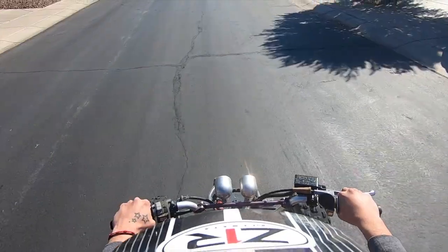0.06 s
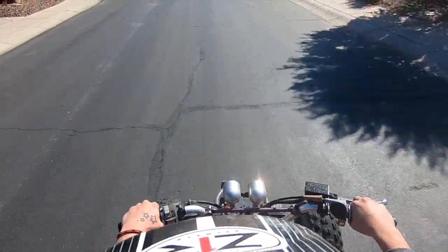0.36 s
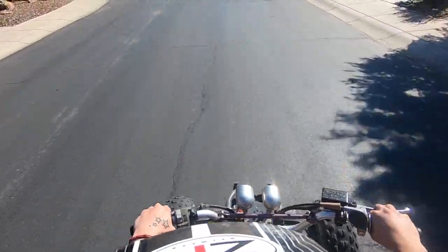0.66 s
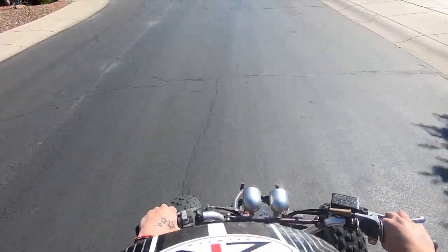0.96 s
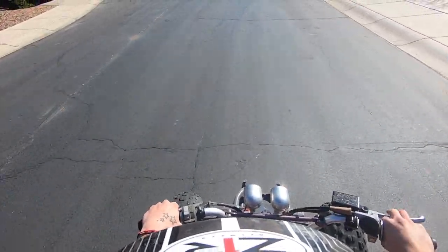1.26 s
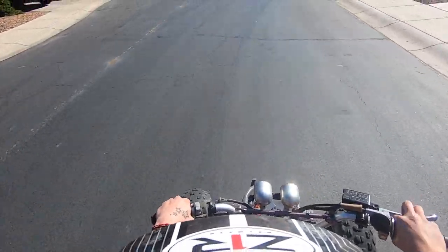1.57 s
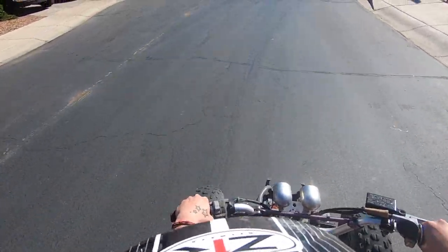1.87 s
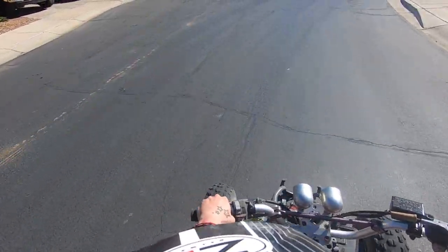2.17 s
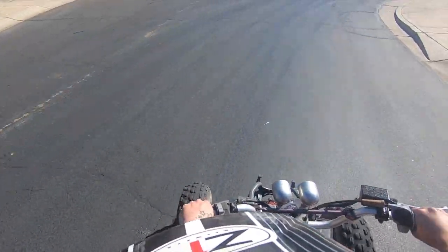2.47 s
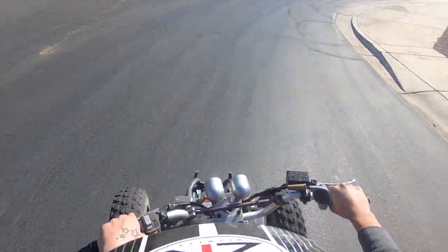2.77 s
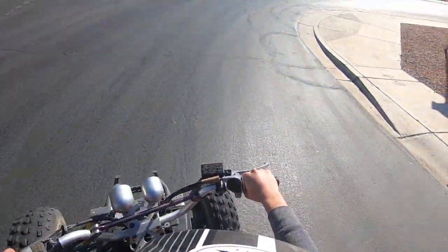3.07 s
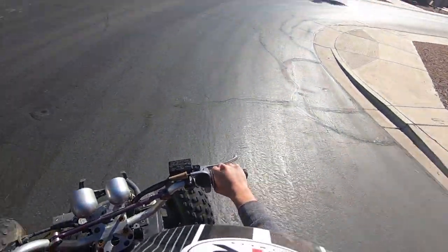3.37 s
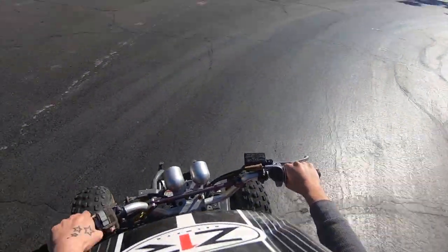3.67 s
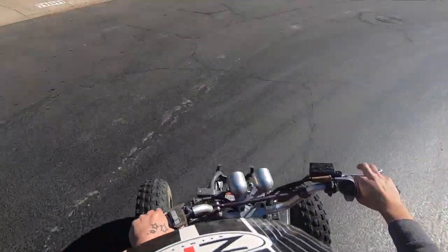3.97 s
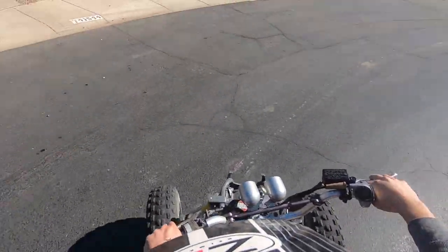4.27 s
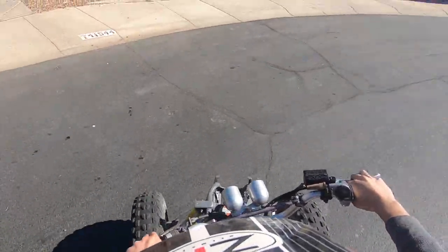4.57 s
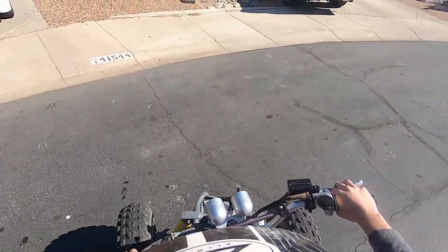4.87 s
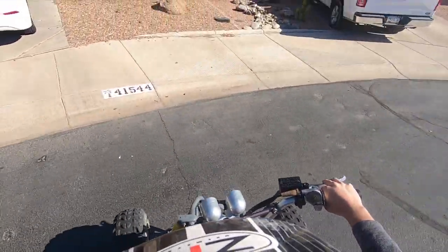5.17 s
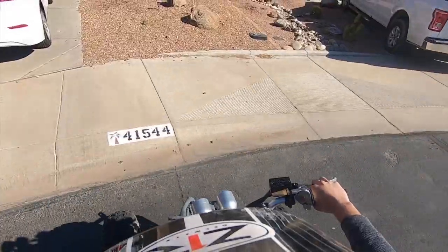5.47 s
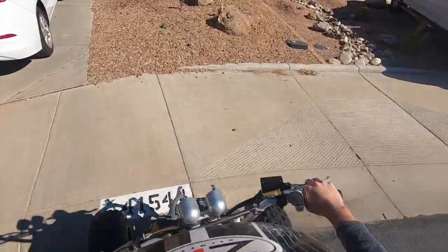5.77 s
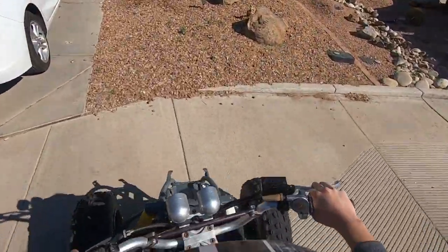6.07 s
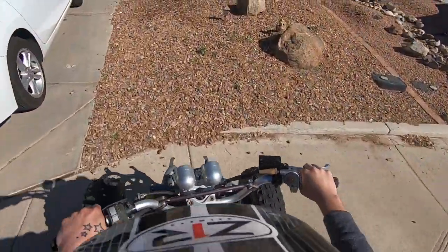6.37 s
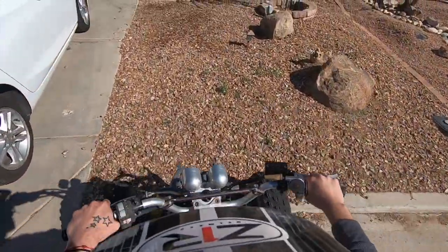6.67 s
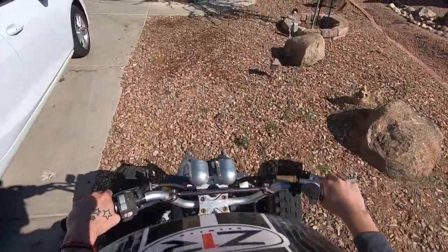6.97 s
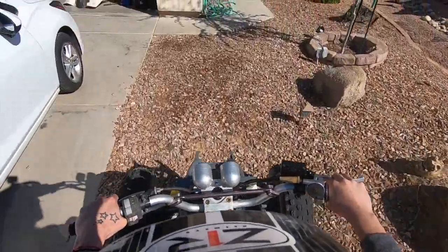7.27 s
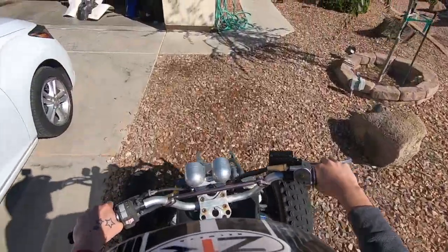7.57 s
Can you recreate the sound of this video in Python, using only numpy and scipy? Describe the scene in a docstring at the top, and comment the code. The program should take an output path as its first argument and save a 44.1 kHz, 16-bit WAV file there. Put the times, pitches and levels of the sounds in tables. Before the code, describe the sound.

A two-stroke quad bike rides along a street on light throttle, heard from the rider's helmet just above the engine. It rises in pitch and runs in short, booming pulses over rattling parts and soft tyre roar. A brake chirps repeatedly, and one hard gust hits the microphone midway. The engine falls, stumbling into single metallic pops, then settles to a quick, regular putter as gravel clicks faintly under the tyres.

```python
"""A street, from a microphone on the rider's helmet, close above a two-stroke quad bike on light throttle.
The crank pumps a hum through the pipe. At speed the charge lights in short booming runs, about ten a
second; lower down the engine stumbles and lets off single pops, each with a metallic crack. Loose parts
rattle, a brake chirps and the tyres roar softly. The quad slows to a quick, regular putter as it rolls
onto gravel. A little wind rumbles on the microphone, with one hard gust midway."""
import sys
import numpy as np
from scipy import signal
from scipy.fft import rfft, irfft
from scipy.io import wavfile
from scipy.ndimage import uniform_filter1d

SR = 44100
rng = np.random.default_rng(int(sys.argv[2]) if len(sys.argv) > 2 else 0)


def store_wav(level_fs):
    """Save 16-bit WAV to argv[1]."""
    pcm = np.round(np.clip(np.atleast_2d(level_fs), -1, 1) * 32767)
    wavfile.write(sys.argv[1], SR, pcm.T.astype(np.int16))


N = 335601
TIME = np.arange(N) / SR
HZ = np.fft.rfftfreq(N, 1 / SR)

# Single pops. Each row: start in seconds, crack in dB over the coasting engine, relative boom in dB.
POPS = [(0.09, 6, 0.5), (0.134, 2, -3.5), (0.168, 6.5, -12.5), (0.2, 6, 1), (0.272, 0, -0.5),
        (0.355, 4.5, 4.5), (0.451, -5, 6.5), (3.741, 3, 5.5), (3.785, 6, -1), (3.858, 9, -1),
        (3.927, 9, -0.5), (3.97, 5, -0.5), (4.017, 10, 1.5), (4.1, 3, 4), (4.143, 3, 8), (4.191, 10, 1.5),
        (4.298, 9, -2.5), (4.332, -5, -1.5), (4.389, 11.5, 5.5), (4.424, 7.5, 3.5), (4.541, 12, 4),
        (4.627, 6.5, 10), (4.712, 8, 8), (4.761, -1, 1), (4.796, 5, 5), (4.842, 12, -2), (4.923, 11, 8.5),
        (4.999, 8.5, 7), (5.052, 8, 2), (5.083, 9.5, -1.5), (5.116, 5, 8.5), (5.157, 8.5, 4.5),
        (5.192, 9, 3), (5.248, 1, 1.5), (5.303, 8, 4.5), (5.338, 1, -4.5), (5.42, 1.5, 6.5),
        (5.524, 5.5, 6), (5.575, -0.5, 3.5), (5.618, 3.5, 7), (5.669, 1, 5), (5.711, 5.5, 7.5),
        (5.766, 4, 7), (5.805, 5.5, 8.5), (5.861, -3, 6), (5.911, 8, 4.5), (5.959, 1, 1), (6.007, 4, 2.5),
        (6.064, -9, 1.5), (6.128, 5, 5), (6.169, -8, -2.5), (6.207, 3, 3.5), (6.263, 0, 10.5),
        (6.309, 9, 4), (6.363, 9.5, -1), (6.419, 6, 10.5), (6.471, 5, 8), (6.519, 8.5, 5.5),
        (6.566, 3, 9.5), (6.613, 3, 11), (6.658, 5, 10.5), (6.702, 2, 5), (6.747, 0, 8.5), (6.788, 1, 9),
        (6.847, 4, 8.5), (6.897, 1, 8), (6.945, 7.5, 5.5), (6.996, 4.5, 7.5), (7.034, -3, 10),
        (7.077, 4, 8.5), (7.116, 5, 8), (7.171, 7.5, 5), (7.226, 5, 1.5), (7.279, 4, 9.5), (7.32, 6, 8),
        (7.374, 6, 9), (7.42, 3, 6), (7.462, 8.5, 9), (7.507, 8.5, 6), (7.555, 2, 2)]


def amp(db):
    """Decibels to gain."""
    return 10 ** (np.asarray(db) / 20)


def unit(x):
    """Scales to rms 1."""
    return x / np.sqrt(np.mean(x ** 2) + 1e-20)


def smooth(x, size):
    """Running mean over size samples, taken twice."""
    return uniform_filter1d(uniform_filter1d(x, size), size)


def steady(x, size=7000):
    """Holds the slow level at rms 1 and keeps the fast beats."""
    return x / np.sqrt(abs(smooth(x ** 2, size)) + 1e-12)


def drift(size):
    """Random wander of rms 1, smoothed over size samples."""
    return unit(smooth(rng.standard_normal(N), size))


def curves(table, at=TIME):
    """Reads a table's later columns along its first, by default at every sample's time."""
    axis, *columns = np.transpose(table)
    return [np.interp(at, axis, column) for column in columns]


def response(points, hz=HZ):
    """Gain of a spectrum at the given frequencies."""
    point_hz, db = np.transpose(points)
    return amp(np.interp(np.log(hz + 1), np.log(point_hz), db))


def peaks(modes):
    """Summed gain of resonances with steep skirts."""
    return np.sqrt(sum(amp(db) ** 2 / (1 + ((HZ - hz) / width) ** 2) ** 2 for hz, width, db in modes))


def colour(x, gain):
    """Minimum-phase filter with the given gain at each frequency of HZ."""
    coarse_gain = np.interp(np.fft.rfftfreq(8192, 1 / SR), HZ, gain)
    cepstrum = irfft(np.log(np.maximum(coarse_gain, 1e-5)))
    cepstrum[1:4096] *= 2
    cepstrum[4097:] = 0
    impulse = irfft(np.exp(rfft(cepstrum)))[:4096]
    return signal.oaconvolve(x, impulse)[:N]


def firings(pop_decay_s=.023, pop_length_s=.025, pop_shift_db=-5.5):
    """Crack and boom envelopes, 1 when coasting: a firing cracks quickly as its boom swells and fades."""
    # Runs of firing at speed. Each row: start in seconds, boom in dB over coasting, length in seconds.
    runs = [(0.462,2,0.18),(0.603,2.5,0.055),(0.673,2.5,0.04),(0.96,3.5,0.045),(1.044,5.5,0.056),(1.119,-2,0.078),(1.177,0,0.068),(1.256,7.5,0.05),(1.363,4,0.033),(1.496,8.5,0.015),(1.574,4.5,0.064),(1.669,9,0.054),(1.754,6,0.059),(1.86,-1.5,0.1),(1.973,0.5,0.033),(2.056,1.5,0.027),(2.179,9,0.028),(2.291,8.5,0.048),(2.401,8,0.031),(2.501,6.5,0.038),(2.57,4.5,0.054),(2.629,11.5,0.017),(2.664,8.5,0.045),(2.718,6,0.032),(2.762,3.5,0.039),(2.821,1.5,0.062),(2.932,6.5,0.047),(3.027,10,0.048),(3.13,8.5,0.034),(3.214,6,0.028),(3.254,3,0.054),(3.324,7,0.05),(3.4,6.5,0.058),(3.497,2.5,0.037),(3.59,3.5,0.071),(3.698,6,0.032)]
    events = [(s, 5 + .48 * db, .63 * length, db, length) for s, db, length in runs]
    events += [(s, crack_db, pop_decay_s, db + pop_shift_db, pop_length_s) for s, crack_db, db in POPS]
    crack_power, boom_power = np.ones(N), np.ones(N)
    for s, crack_db, decay, boom_db, length in events:
        start = round(s * SR)
        part = slice(start, start + SR // 5)
        t = TIME[part] - TIME[start]
        snap = (1 - np.exp(-t / (.1 * decay))) * np.exp(-t / decay)
        swell = abs(np.sin(np.pi * np.minimum(t / length, 1))) ** .7
        crack_power[part] += (amp(crack_db) * snap) ** 2
        boom_power[part] += (amp(boom_db) * swell) ** 2
    return np.sqrt(crack_power), np.sqrt(boom_power)


def exhaust(speed, turns, boom, clearing=.04, full_pickup=190):
    """Expansion chamber: a steady hum plus the burble of uneven puffs, roughest in a flat spot."""
    # Each row: time in seconds, level in dB.
    levels = [(0,-18.5),(.4,-11.5),(.95,-11),(1.4,-13.5),(2.2,-12),(3.4,-12),(3.68,-18),(4.05,-12.5),(4.42,-14),(4.95,-13),(7.61,-12.5)]
    # How the charge burns. Each row: turns a second, uneven share of the power, upper modes' gain in dB.
    burn = [(74.4,.17,-3.5),(79,.22,-2),(85.5,.27,-.5),(99.3,.42,2),(111,.72,7),(124,.28,3),(132,.16,2),(142,.14,0),(158,.27,-3)]
    # The chamber's rings. Each row: frequency in Hz, width in Hz, relative level in dB.
    deep_modes = [(137.3, 18.5, -6.5), (225.3, 14.9, 4.5)]
    upper_modes = [(265.5, 20.5, -2), (303.4, 59.4, -3.5), (408.3, 14, -5)]
    rough, upper_db = curves(burn, at=speed)
    pickup = smooth(np.gradient(speed, TIME), size=4000)  # turns a second gained each second
    rough *= 1 - clearing * np.clip(pickup / full_pickup, 0, 1)  # clears a little as the engine pulls
    uneven = puffs(turns, mean=.17, hiss=.085)
    rings = colour(uneven, peaks(deep_modes)) + amp(upper_db) * colour(uneven, peaks(upper_modes))
    burble = steady(steady(rings, size=1100) * boom ** .5)
    blend = np.sqrt(1 - rough) * hum(speed, turns, boom) + np.sqrt(rough) * burble
    return amp(curves(levels)[0]) * blend


def puffs(turns, mean, hiss):
    """One puff of uneven strength every half turn, with a little turbulence."""
    beats = np.diff(np.floor(2 * turns), prepend=0) > 0
    return unit(beats * (mean + rng.standard_normal(N))) + hiss * rng.standard_normal(N)


def hum(speed, turns, boom, flutter=.29, odd_swell=.98, even_swell=1.56):
    """Low crank orders sweep through the pipe's response; the one nearest its tuning stands out."""
    # Each row: multiple of the crank speed, relative level in dB ahead of the pipe.
    orders = [(1, 0.5), (2, 1), (3, 5), (4, -4.5), (5, 4)]
    # Pipe and silencer. Each row: frequency in Hz, gain in dB.
    pipe = [(65, -29), (86, -3.5), (104, -15.5), (116, -18), (145, -8), (180, -4.5), (220, -1.5),
            (265, 1.5), (305, -1), (345, -7), (385, -13), (430, -17), (490, -19), (600, -25.5), (800, -31)]
    out = np.zeros(N)
    for k, db in orders:
        swell = boom ** (odd_swell if k % 2 else even_swell)
        out += amp(db) * response(pipe, k * speed) * order_tone(turns, k, flutter) * swell
    return steady(out)


def order_tone(turns, k, flutter):
    """One multiple of the crank speed, wavering in strength."""
    waver = 1 + flutter * drift(900)
    return waver * np.cos(2 * np.pi * (k * turns + rng.random()))


def rasp(turns, crack, boom):
    """Sharp puffs excite the tailpipe's rings."""
    # Each row: frequency in Hz, width in Hz, relative level in dB.
    modes = [(504, 64.5, -3), (592.8, 35.5, 4.5), (672.4, 14, 2), (750, 36, -1.5), (867, 41, -10.5),
             (920, 244, -18.5)]
    slaps = puffs(turns, mean=.6, hiss=.4) * crack ** .75 * boom ** .35
    return steady(colour(slaps, peaks(modes)))


def putter(speed, level_db=-27, strengths=(1, .4, 1, .35, .55), spread_db=3.5):
    """Each pop sends a few sharp puffs, half a turn apart, down the ringing pipe and silencer."""
    # Each row: frequency in Hz, width in Hz, relative level in dB.
    modes = [(342.5,39,1),(411,21,4),(553,39,-5.5),(587,20,-7.5),(689,6.1,-4),(735,27.4,-5),(931,40,-12.5),(1344,32,-22)]
    slaps = np.zeros(N + SR)
    for s, _, db in POPS:
        half_turn_s = .5 / np.interp(s, TIME, speed)
        for k, strength in enumerate(strengths):
            at = round((s + k * half_turn_s) * SR)
            slaps[at] += strength * amp(db + spread_db * rng.standard_normal())
    return amp(level_db) * unit(colour(slaps[:N], peaks(modes)))


def whine(speed, turns, boom, flutter=.36, swell=.9, slip=.032):
    """High crank orders light up as they cross the tailpipe's tuning, and get ragged at speed."""
    # Each row: multiple of the crank speed, relative level in dB.
    orders = [(4, 6), (5, -7), (6, -10), (7, -5), (8, -9), (9, 2.5), (10, 4)]
    # Each row: frequency in Hz, gain in dB.
    tailpipe = [(450,-19.5),(540,-6.5),(595,-3),(640,-2.5),(672,1),(705,-9.5),(742,7.5),(790,-12),(900,-18.5),(1300,-37.5)]
    # Each row: time in seconds, level in dB.
    levels = [(0,-42),(.58,-38),(.72,-31),(.88,-34),(1.15,-30),(1.65,-27),(2.1,-34),(3.4,-33),(4.2,-38),(5.9,-36),(6.06,-27.5),(6.26,-26.5),(6.4,-34),(6.65,-30),(6.95,-33),(7.17,-29),(7.37,-27),(7.61,-34)]
    strain = (speed / speed.max()) ** 2
    ragged_turns = turns + slip * strain * drift(300)
    tones = sum(amp(db) * response(tailpipe, k * speed) * order_tone(ragged_turns, k, flutter * strain)
                for k, db in orders)
    return amp(curves(levels)[0]) * steady(tones * boom ** (swell * np.sqrt(strain)))


def clatter(turns, decay_turns, spread_db):
    """Piston and port noise: a burst of uneven size every half turn over an even hiss."""
    stroke = (2 * turns).astype(int)
    sizes = amp(spread_db * rng.standard_normal(N))[stroke]
    bursts = sizes * np.exp(-(turns % .5) / decay_turns)
    return unit((1 + bursts) * rng.standard_normal(N))


def cases(blows):
    """Cylinder and cases clatter; each of their rings comes and goes on its own."""
    # The broad clatter. Each row: frequency in Hz, relative level in dB.
    spectrum = [(400, -6.5), (900, 10), (1200, 3), (1650, 2), (2000, 2), (2400, -5), (3300, 0.5),
                (4200, -4), (5200, -10), (5900, -15.5), (7600, -19), (8500, -32), (11000, -25),
                (16000, -57.5)]
    # The rings on top of it. Each row: frequency in Hz, width in Hz, relative level in dB.
    modes = [(2704, 250, 2), (3447, 190, 6), (3700, 450, -7.5), (4138, 71, 10), (4773, 110, 6),
             (7600, 600, 3)]
    body = response(spectrum)
    out = colour(blows, body * np.hypot(1, peaks(modes) / 2))
    shake = np.sqrt(abs(smooth(blows ** 2, size=40)))
    for mode in modes:
        wander = amp(2.2 * drift(3000) - 2.5)
        out += wander * colour(shake * rng.standard_normal(N), body * peaks([mode]))
    return steady(out)


def wall_ring(knocks, force):
    """The thin pipe wall sings on one sharp mode or buzzes on the dull cluster around it."""
    # Each row: frequency in Hz, width in Hz, relative level in dB.
    sharp_mode = [(1411, 18, 0)]
    cluster = [(1283, 51, -1.4), (1483, 126, 0.42)]
    # Each row: time in seconds, share of the wall's power in the sharp mode.
    shares = [(0, 0.86), (.7, 0.06), (1.6, 0.05), (2.3, 0.28), (3.1, 0.72), (3.7, 0.82), (4.1, 0.13),
              (7.6, 0.69)]
    sharp, = curves(shares)
    song = steady(colour(knocks, peaks(sharp_mode)), size=700) * smooth(force, size=400)
    buzz = colour(knocks * force, peaks(cluster))
    return np.sqrt(sharp) * steady(song) + np.sqrt(1 - sharp) * steady(buzz)


def pinging(knocks, crack):
    """Two thin metal parts ping at each firing and ring on briefly."""
    # Each row: frequency in Hz, width in Hz, how sharply the part answers a firing.
    parts = [(2755, 55, 2.4), (3775, 60, 2.4)]
    # Each row: time in seconds, lower ping in dB, upper ping in dB.
    levels = [(0,-42,-44),(.45,-56,-49),(2.1,-56.5,-66),(2.65,-44,-45),(3.25,-56,-55),(3.6,-44,-41),(4.4,-53,-41),(5.0,-53,-49),(5.4,-58,-64),(7.61,-49,-44.5)]
    out = np.zeros(N)
    for (hz, width, sharpness), db in zip(parts, curves(levels)):
        pole = np.exp(-2 * np.pi * width / SR)
        swell = np.sqrt(signal.lfilter([1 - pole], [1, -pole], crack ** (2 * sharpness)))
        ring = steady(colour(knocks, peaks([(hz, width, 0)])), size=700)
        out += amp(db) * steady(ring * swell, size=12000)
    return out


def sizzle(turns, crack):
    """The top of the piston and port noise flares with each crack."""
    # Each row: frequency in Hz, relative level in dB.
    spectrum = [(3000, -22.5), (5000, 4.5), (7000, 6), (9000, 0), (11000, -5), (12500, -4.5), (13800, -18),
                (15000, -28.5)]
    # Each row: time in seconds, level in dB.
    levels = [(0,-49),(.38,-63),(.85,-62),(1.25,-51),(1.78,-53),(2.12,-58),(2.65,-52.5),(3.3,-48),(3.9,-59),(4.62,-68),(4.95,-61),(5.45,-65),(6.15,-62.5),(6.6,-55),(7.61,-49.5)]
    flares = clatter(turns, decay_turns=.075, spread_db=.5) * crack ** 2
    return amp(curves(levels)[0]) * steady(colour(flares, response(spectrum)))


def brake_squeal(pitch_hz=3166, waver=.0012):
    """The brake disc sings a thin, nearly pure note each time it rubs."""
    # Each row: middle in seconds, peak in dB, length in seconds.
    chirps = [(2.36,-43,.05),(2.53,-39,.055),(2.61,-36,.075),(2.715,-37,.055),(2.8,-37,.06),(2.89,-35.5,.07),(2.985,-37.5,.055),(3.07,-37.5,.055),(3.155,-37,.065),(3.245,-36.5,.07),(3.325,-38.5,.055),(3.465,-41,.045),(3.555,-38,.05),(3.64,-40,.045),(3.765,-39,.045)]
    level = sum(amp(db) * np.cos(np.pi * np.clip((TIME - s) / length, -.5, .5))
                for s, db, length in chirps)
    hz = pitch_hz * (1 + waver * drift(500))
    return level * np.sin(2 * np.pi * np.cumsum(hz) / SR)


def rattles(clicks_per_s=1500, hiss=.7, pop_shift_db=-47.5, pop_decay_s=.0094):
    """Loose parts give short, dying bursts of metallic clicks, most on an engine firing."""
    # Short rattles and ticks. Each row: start in seconds, peak in dB, decay in seconds.
    rattle_bursts = [(.094,-39,0.044),(.128,-39,0.034),(.168,-44,0.056),(.297,-34,.01),(.49,-31,0.0078),(.555,-33,0.01),(.684,-35,0.028),(2.268,-28.5,0.0078),(2.58,-38,.02),(2.63,-27,0.015),(2.669,-36,.013),(2.722,-36,0.015),(2.858,-33,0.03),(3.503,-30,.014),(3.6,-31,0.0099)]
    # Each row: frequency in Hz, relative level in dB.
    spectrum = [(1200,-22),(2300,-7),(2800,2.5),(3400,0.5),(4200,-1.5),(5500,-7.5),(7600,-16.5),(9000,-23),(12500,-38.5),(15000,-65)]
    pop_bursts = [(s, crack_db + pop_shift_db, pop_decay_s) for s, crack_db, _ in POPS]
    level = np.zeros(N)
    for s, db, decay in rattle_bursts + pop_bursts:
        part = slice(round(s * SR), round(s * SR) + SR // 4)
        level[part] += amp(db) * np.exp(-(TIME[part] - s) / decay)
    clicks = unit((rng.random(N) < clicks_per_s / SR) * rng.choice([-1, 1], N))
    return level * unit(colour(clicks + hiss * rng.standard_normal(N), response(spectrum)))


def tyres():
    """Knobbly tread gives a soft, broad roar on the asphalt while the quad is fast."""
    # Each row: time in seconds, level in dB.
    levels = [(0,-60),(.85,-44),(1.3,-40),(1.8,-41.5),(2.4,-45),(3.4,-42),(4.2,-56),(5.5,-69.5)]
    # Each row: frequency in Hz, relative level in dB.
    spectrum = [(300,-12.5),(900,0.5),(1300,-3),(1900,-1),(2400,-7.5),(3200,-16.5),(6000,-20),(14000,-45.5)]
    return amp(curves(levels)[0]) * unit(colour(rng.standard_normal(N), response(spectrum)))


def gravel(clicks_per_s=280, spread_db=5):
    """Small stones click against each other under the tyres."""
    # Each row: time in seconds, level in dB.
    levels = [(0, -70), (6.2, -73), (6.5, -64), (7.0, -47), (7.6, -46)]
    # Each row: frequency in Hz, relative level in dB.
    spectrum = [(500, -37.5), (1500, -12.5), (3500, 13.5), (6000, -7), (9000, -18), (13000, -22.5),
                (16000, -38)]
    hits = rng.random(N) < clicks_per_s / SR
    sizes = amp(spread_db * np.minimum(rng.exponential(1, N), 3))
    clicks = hits * sizes * rng.choice([-1, 1], N)
    return amp(curves(levels)[0]) * unit(colour(clicks, response(spectrum)))


def wind(breeze_db=-36, lump_db=2):
    """Lumpy low rumble on the microphone: a light breeze and a few gusts."""
    # Each row: middle in seconds, peak in dB, half width in seconds.
    gusts = [(.03,-23.5,0.33),(.9,-39,0.27),(2.92,-26.5,0.15),(3.5,-24,0.1),(3.74,-32,0.03),(5.15,-27,0.2),(5.77,-24,0.057),(6.3,-25,0.14)]
    # Each row: frequency in Hz, relative level in dB.
    spectrum = [(10, -8.5), (25, -15), (55, -3.5), (90, -3.5), (140, -6.5), (300, -35.5), (1000, -63),
                (4000, -89)]
    gust_power = sum(amp(db) ** 2 * np.exp(-2 * ((TIME - s) / width) ** 2) for s, db, width in gusts)
    lumps = amp(lump_db * drift(3000))
    rumble = steady(lumps * colour(rng.standard_normal(N), response(spectrum)), size=4000)
    return np.sqrt(amp(breeze_db) ** 2 + gust_power) * rumble


def rush(rough_db=.5):
    """One hard gust tears past the helmet in a short, rough rush."""
    # Each row: time in seconds, level in dB.
    levels = [(3.2,-60),(3.33,-35),(3.44,-16.5),(3.53,-20.5),(3.63,-23),(3.72,-26),(3.9,-63)]
    # Each row: frequency in Hz, relative level in dB.
    spectrum = [(40,-14.5),(90,-1.5),(200,5),(300,0.5),(420,-5.5),(560,-11.5),(750,-12.5),(1000,-19.5),(1300,-21.5),(2500,-37),(6000,-60.5)]
    lumps = amp(rough_db * drift(300))
    air = steady(lumps * colour(rng.standard_normal(N), response(spectrum)), size=2000)
    return amp(curves(levels)[0]) * air


def scene():
    """The engine close below the microphone, with brake, loose parts, tyres and wind around it; mono."""
    # Each row: time in seconds, crank speed in turns a second.
    crank_speeds = [(0,96),(.48,109),(.58,123),(.64,151),(.72,141),(.87,146),(1.0,146),(1.15,155),(1.38,165),(1.52,154),(1.7,152),(1.8,159),(2.05,140.3),(2.27,133),(2.48,133),(2.61,130),(2.8,126.6),(3.07,133.5),(3.39,132),(3.8,111),(4.15,112.7),(4.62,101.2),(5.05,101.3),(5.36,87.5),(5.66,83.5),(5.87,86),(6.05,74.2),(6.3,72.6),(6.4,75),(6.53,85.4),(6.72,89),(6.9,77.4),(7.1,74.2),(7.27,73.9),(7.39,79.4),(7.48,79.4),(7.61,77)]
    # Each row: time in seconds, throttle opening from 0 to 1.
    openings = [(.13,0.76),(.35,0.48),(.6,0.89),(.88,0.16),(1.02,0.71),(1.3,0.61),(1.85,0.51),(2.15,0.2),(2.55,0.86),(3.15,0.45),(3.5,0.7),(4.62,0.26),(4.98,0.67),(5.42,0.16),(6.1,0.58),(6.55,0.9),(7.61,0.83)]
    # With the throttle closed. Each row: turns a second, then rasp, cases and pipe wall in dB.
    closed_levels = [(75.97,-29.5,-42,-48.5),(80.9,-27,-41,-44.5),(93,-31.5,-39.5,-45.5),(112.6,-27.5,-37.5,-39),(132,-28.5,-36.5,-36),(141,-26.5,-38,-39),(157,-26,-36.5,-40.5)]
    speed, = curves(crank_speeds)
    throttle, = curves(openings)
    rasp_db, cases_db, wall_db = curves(closed_levels, at=speed)
    turns = np.cumsum(speed * (1 + .005 * drift(600))) / SR  # the crank never turns quite evenly
    crack, boom = firings()
    # Every firing knocks the pipe wall, the cases and the thin parts.
    knocks = clatter(turns, decay_turns=.11, spread_db=5.5)
    metal = (amp(wall_db) * wall_ring(knocks, crack ** .82 * boom ** .87)
             + amp(cases_db + 8 * throttle) * cases(knocks * crack ** .66 * boom ** .62)
             + pinging(knocks, crack) + sizzle(turns, crack))
    pipe = (exhaust(speed, turns, boom)
            + amp(rasp_db + 4 * throttle) * rasp(turns, crack, boom)
            + whine(speed, turns, boom) + putter(speed))
    return (pipe + metal + brake_squeal() + rattles() + tyres() + gravel() + wind() + rush())[None]


def record(dry, limit_db=-10.5, ratio=7.5, cutoff_hz=15650, fade_s=.002):
    """A quick limiter flattens the booms; peaks are rounded, the ends eased and the top treble cut."""
    power_db = 10 * np.log10(abs(smooth(dry[0] ** 2, size=400)) + 1e-12)
    held = dry / amp(np.maximum(power_db - limit_db, 0) * (1 - 1 / ratio))
    rounded = held / (1 + held ** 6) ** (1 / 6)
    fade = np.minimum(np.minimum(TIME, TIME[::-1]) / fade_s, 1)
    lowpass = signal.firwin(511, cutoff_hz, window=("kaiser", 9), fs=SR)
    return signal.oaconvolve(rounded * fade, lowpass[None], "same")


dry = scene()
out = record(dry)
store_wav(out)
```